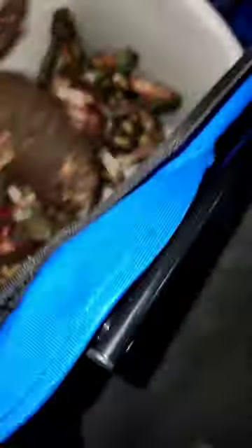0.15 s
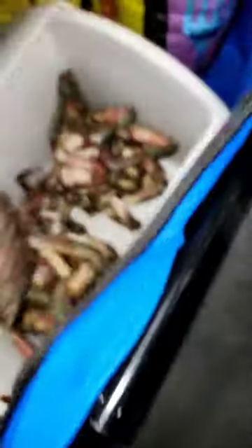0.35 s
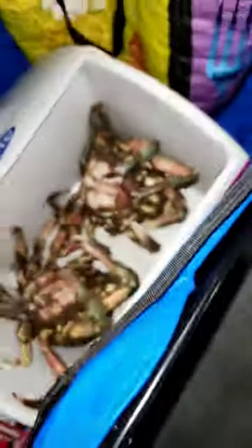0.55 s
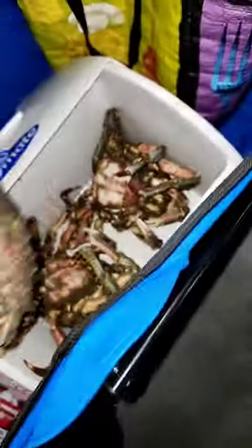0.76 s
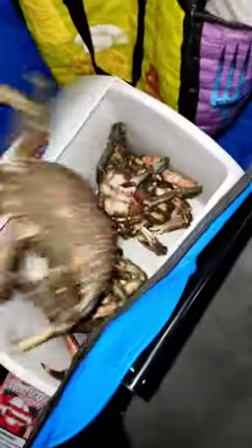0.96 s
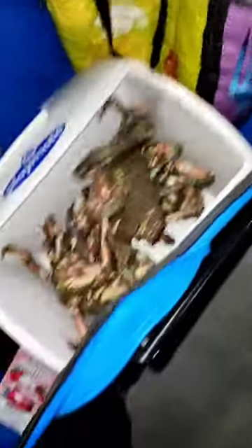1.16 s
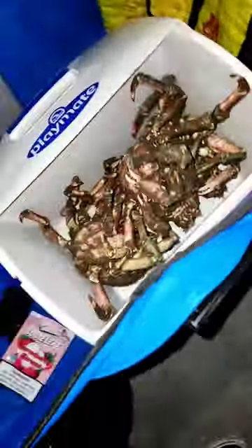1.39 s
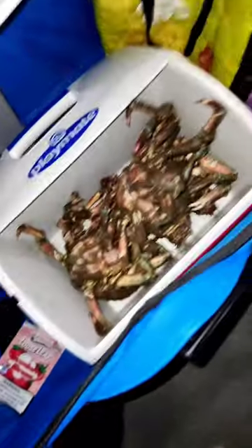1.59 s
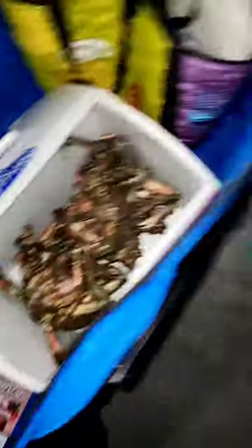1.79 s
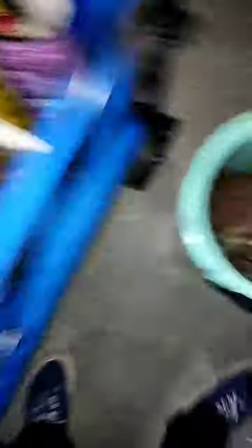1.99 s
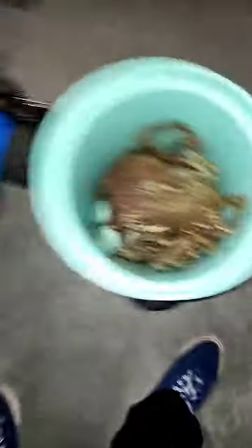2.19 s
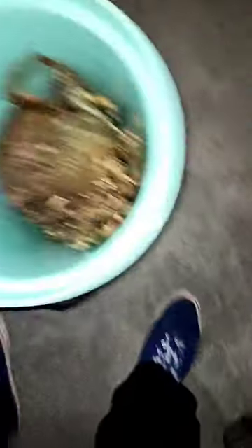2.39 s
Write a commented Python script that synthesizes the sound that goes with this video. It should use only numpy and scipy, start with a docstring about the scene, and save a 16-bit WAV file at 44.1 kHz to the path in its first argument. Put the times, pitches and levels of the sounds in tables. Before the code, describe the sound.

Live crabs tumble and clatter into a hollow hard plastic box, shells clacking and legs scrabbling

```python
"""In a large shed, live crabs tumble into a hard plastic cool box, close to a hand-held phone.
Bodies thump the hollow walls: decaying wall modes, soon damped by the weight of the crab.
Shells clack in short crunchy bursts: clustered contacts drive shell and claw-tip modes.
Legs scrabble in between as random ticks, and a few sliding tips squeak at one resonance.
A low rumble, a broad drone and a distant hiss, all shaped noise, lie behind."""
import sys
import numpy as np
from scipy import signal
from scipy.fft import rfft, irfft
from scipy.io import wavfile
from scipy.ndimage import uniform_filter1d

SR = 44100
rng = np.random.default_rng(int(sys.argv[2]) if len(sys.argv) > 2 else 0)


def generate_wav(sig):
    """Save sig (samples, or channels by samples) to the path in sys.argv[1] as 16-bit PCM at SR."""
    pcm = np.round(np.clip(np.atleast_2d(sig).T, -1, 1) * 32767).astype(np.int16)
    wavfile.write(sys.argv[1], SR, pcm)


N = 108045

# Modes of the box wall. Each row: multiple of the wall pitch, level in dB,
# 60 dB decay time in seconds of a struck wall.
WALL_MODES = [(1.002, 0, 0.14), (1.362, -9.5, 0.067), (2.05, -14, 0.11), (3.0, -19, 0.048)]
# Modes of a shell. Each row: nominal frequency in Hz, level in dB, 60 dB decay time in seconds.
SHELL_MODES = [(741, 7.5, 0.01), (967, -1.5, 0.027), (1183, -0.5, 0.016), (1535, 0.5, 0.012),
               (1708, 4.5, 0.0072), (2071, 2, 0.0072), (2507, -6, 0.0082)]
# Modes of the thin claw tips. Each row: nominal frequency in Hz, level in dB,
# 60 dB decay time in seconds.
CLAW_MODES = [(3500, 0, 0.024), (3760, 2, 0.04), (4890, 5.5, 0.015), (5170, 11.5, 0.014)]
# Colour of the crunch. Each row: frequency in Hz, relative spectral level in dB per Hz.
CRUNCH_COLOUR = [(900, -26), (1800, 3.5), (2900, -3), (5300, -3.5), (7500, -9.5), (9600, -12), (12500, -4),
                 (13300, -7)]

CONTACTS_PER_S, CONTACT_SPREAD_DB = 7000, 2  # dense contacts of shells
LEG_TICKS_PER_S, LEG_SPREAD_DB = 2200, 2.5
CLAW_DB = -4.5  # claw-tip ringing relative to the crunch that drives it
WALL_LOW_HZ = 156.5  # the box radiates little below this


def undb(db):
    """Level in decibels to amplitude ratio."""
    return 10 ** (np.asarray(db) / 20)


def unit(x):
    """Normalises to a root-mean-square of one."""
    return x / np.sqrt(np.mean(x ** 2))


def curve(table, col):
    """Linear interpolation of one table column over the whole scene."""
    rows = np.array(table)
    return np.interp(np.arange(N) / SR, rows[:, 0], rows[:, col])


def low_pass(x, hz, order=2):
    """Butterworth filter that keeps what lies below hz."""
    return signal.sosfilt(signal.butter(order, hz, fs=SR, output="sos"), x)


def high_pass(x, hz, order=2):
    """Butterworth filter that keeps what lies above hz."""
    return signal.sosfilt(signal.butter(order, hz, "high", fs=SR, output="sos"), x)


def colour(x, points):
    """Spectral shaping by (Hz, dB) points, interpolated over log frequency."""
    p = np.array(points)
    f = np.maximum(np.arange(len(x) // 2 + 1) * SR / len(x), 1)
    gain = undb(np.interp(np.log(f), np.log(p[:, 0]), p[:, 1]))
    return irfft(rfft(x) * gain, len(x))


def ring(x, hz, t60):
    """A driven, exponentially decaying mode: a two-pole resonator."""
    radius = np.exp(-np.log(1000) / (t60 * SR))
    angle = 2 * np.pi * hz / SR
    return signal.lfilter([np.sin(angle)], [1, -2 * radius * np.cos(angle), radius ** 2], x)


def ticks(rate, spread_db):
    """Random impulses: tiny contacts of either sign, a few much stronger than the rest."""
    u = rng.random((N, 2))
    strength = undb(-spread_db * np.log(1 - u[:, 1]))
    return unit((u[:, 0] < rate / SR) * strength * rng.choice([-1, 1], N))


def walk(rate):
    """Slow random fluctuation with a spread near 1: twice-smoothed steps."""
    k = int(SR / rate)
    steps = np.repeat(rng.standard_normal(N // k + 1), k)
    return 2.5 * uniform_filter1d(uniform_filter1d(steps, k), k)[:N]


def add(out, s, x):
    """Superposition of a sound that starts at s seconds."""
    i = int(s * SR)
    out[i:i + len(x)] += x[:N - i]


def shell(x, modes, hz, octaves):
    """Modal excitation: a shell or claw rings strongest near the pitch of the struck spot."""
    ratios = (hz / f for f, _, _ in modes)
    tune = min(ratios, key=lambda r: abs(np.log(r)))
    tune = np.clip(tune, .9, 1.1)  # draws the nearest mode to that pitch, by a tenth at most
    out = 0
    for k, (f, db, t60) in enumerate(modes):
        distance = np.log2(f / hz) / octaves
        out = out + (-1) ** k * undb(db - 3.6 * distance ** 2) * ring(x, f * tune, t60)
    return out


def shed():
    """Broadband noise of a large space: a drone, a fluctuating rumble and a distant hiss."""
    # Colour of the shed air. Each row: frequency in Hz, relative spectral level in dB per Hz.
    air_colour = [(20, -2.5), (60, -0.5), (146, -12), (240, -23), (327, -12.5), (420, -22.5), (900, -35),
                  (2100, -40.5), (3000, -50), (4500, -100)]
    # Low rumble. Each row: time in seconds, level in dB.
    rumble_level = [(0, -33.5), (.45, -31.5), (.65, -43), (1.0, -37.5), (1.3, -39.5), (1.9, -34.5),
                    (2.25, -35.5)]
    # Colour of the hiss. Each row: frequency in Hz, relative spectral level in dB per Hz.
    hiss_colour = [(1800, -31), (3300, -1), (5000, -2), (6750, -7.5), (12600, -31)]
    # Distant hiss. Each row: time in seconds, level in dB.
    hiss_level = [(1.0, -66.5), (1.9, -72.5), (2.2, -61.5), (2.45, -69)]
    split_hz = 135  # rumble below, drone above

    air = unit(colour(rng.standard_normal(N), air_colour)) * undb(-31.5)
    low = low_pass(air, split_hz, order=4)
    drone = high_pass(air, split_hz, order=4)
    hiss = unit(colour(rng.standard_normal(N), hiss_colour))
    hiss = hiss * undb(curve(hiss_level, col=1) + 0.35 * walk(8.1))
    rumble = unit(low * undb(2.0 * walk(9.36))) * undb(curve(rumble_level, col=1))
    return hiss + rumble + drone * undb(0.36 * walk(6.98))


def legs():
    """Random excitation: legs tick on plastic and shells, and keep the wall modes humming."""
    # Scrabbling legs. Each row: time in seconds, then the levels in dB of the knocking,
    # the treble and the wall hum.
    scrabble = [(0, -53, -55, -34), (.05, -56, -47.5, -48), (.1, -81, -63, -40.5), (.15, -61, -49, -36),
                (.24, -43.5, -45, -28), (.40, -38, -42, -20), (.47, -49, -53, -24.5),
                (.54, -34, -36.5, -20), (.63, -48.5, -46.5, -20.5), (.69, -55, -62.5, -46),
                (.79, -52.5, -52, -39), (.92, -40, -48, -42.5), (.99, -85, -68.5, -46.5),
                (1.21, -86, -63, -52.5), (1.25, -33, -38, -21), (1.35, -76, -58, -41),
                (1.46, -70, -58.5, -42.5), (1.6, -91, -63.5, -45.5)]
    wall_hz = 251
    airy_hz = 7400  # above this the legs rustle
    rustle_db, rustle_db_per_s = 5, -5  # the rustle starts strong and fades steadily

    jerk = undb(1.9 * walk(59.6))
    mid = unit(shell(ticks(LEG_TICKS_PER_S, LEG_SPREAD_DB) * jerk, SHELL_MODES, 1100.0, 4.))

    top = unit(colour(ticks(LEG_TICKS_PER_S, LEG_SPREAD_DB), CRUNCH_COLOUR) * jerk)
    top = unit(top + undb(CLAW_DB) * unit(shell(top, CLAW_MODES, 4700., 2)))
    rustle = colour(ticks(CONTACTS_PER_S, CONTACT_SPREAD_DB), CRUNCH_COLOUR)
    rustle = unit(rustle * undb(1.9 * walk(40.2)))
    rustle_gain = undb(rustle_db + rustle_db_per_s * np.arange(N) / SR)
    top = low_pass(top, airy_hz) + rustle_gain * high_pass(rustle, airy_hz)

    push = high_pass(ticks(600, 1.38), WALL_LOW_HZ)
    # The hum dies away faster than the ring of a struck wall.
    hum = unit(sum(undb(db) * ring(push, m * wall_hz, t60 * 0.39) for m, db, t60 in WALL_MODES))
    return sum(layer * undb(curve(scrabble, col=c)) for c, layer in ((1, mid), (2, top), (3, hum)))


def squeaks():
    """Stick-slip friction: a sliding leg tip keeps one narrow resonance singing."""
    # Squeaks. Each row: start in seconds, pitch in Hz, level in dB, length of the rub in seconds.
    slides = [(0.022, 1720, -53.5, 0.05), (0.864, 3290, -44.5, 0.017), (0.564, 5150, -46, 0.0671),
              (0.89, 1180, -40.5, 0.028)]
    out, t = np.zeros(N), np.arange(SR // 10) / SR
    rub = ticks(LEG_TICKS_PER_S, LEG_SPREAD_DB)
    for s, hz, db, length in slides:
        i = int(s * SR)
        rubbing = t < length
        tone = ring(rub[i:i + len(t)] * rubbing, hz, t60=0.033)
        add(out, s, undb(db) * tone / np.sqrt(np.mean(tone[rubbing] ** 2)))
    return out


def clacks():
    """Impact excitation: a burst of contacts rings shell modes and crunches in the treble."""
    # Shell on shell and wall. Each row: start in seconds, knock peak in dB, knock centre in Hz,
    # crunch peak in dB, crunch centre in Hz, length of the burst in seconds.
    impacts = [(0.131, -53, 1600, -40, 5600, 0.0054), (0.143, -37.5, 1596, -44, 3020, 0.0088),
               (0.174, -52, 1590, -34, 7100, 0.0035), (0.212, -24.5, 1900, -26.5, 5820, 0.021),
               (0.246, -11.5, 1510, -37, 2840, 0.0086), (0.26, -22, 1660, -14, 8200, 0.0083),
               (0.367, -22.5, 1940, -15, 5050, 0.007), (0.371, -7, 1750, -10, 4850, 0.0098),
               (0.416, -20, 1888, -25, 3030, 0.012), (0.429, -23, 1420, -29.5, 5200, 0.031),
               (0.479, -16.5, 1790, -15.5, 3280, 0.0078), (0.509, -15, 1696, -23, 3360, 0.015),
               (0.545, -20.5, 1025, -25.5, 5150, 0.011), (0.567, -14.5, 870, -30, 4870, 0.037),
               (0.599, -12.5, 990, -19.5, 4640, 0.0075), (0.614, -14, 760, -29, 5200, 0.0064),
               (0.634, -10.5, 1160, -38, 3300, 0.0039), (0.638, -26.5, 1870, -23.5, 5510, 0.0075),
               (0.7226, -26.5, 2077, -24.5, 3430, 0.0082), (0.741, -19.5, 976, -30.5, 3800, 0.0062),
               (0.827, -28, 1600, -37, 5370, 0.0032), (0.859, -32.5, 980, -33, 5200, 0.02),
               (0.945, -23, 1960, -23.5, 3580, 0.009), (1.228, -9, 1966, -24.5, 3390, 0.0062),
               (1.2545, -24, 1550, -10, 4100, 0.0099), (1.258, -7.5, 1143, -15.5, 4400, 0.014),
               (1.282, -24.5, 1990, -13.5, 5180, 0.011), (1.308, -16.5, 770, -31, 2800, 0.0057),
               (1.317, -11, 2050, -17, 5000, 0.0052), (1.322, -21, 1000, -29.5, 3310, 0.015),
               (1.384, -23, 930, -33.5, 3460, 0.013), (1.3975, -15.5, 1770, -15, 5100, 0.0041)]
    tail_s, tail_db = 0.017, -10.5  # weaker contacts that follow the burst
    first_db = 14.5  # first contact, over the average of the rest
    knock_octaves, claw_octaves = 0.78, 0.22  # spread of the modes that are favoured
    crunch_octaves, broad_db = 0.7, -14  # band each side of the centre; level added at all pitches
    crunch_rise = 0.192  # share of the length

    out, t = np.zeros(N), np.arange(SR // 6) / SR
    grit = ticks(CONTACTS_PER_S, CONTACT_SPREAD_DB)
    crunch_noise = unit(colour(ticks(CONTACTS_PER_S, CONTACT_SPREAD_DB), CRUNCH_COLOUR))
    tail = undb(tail_db) * np.exp(-t / tail_s)
    for s, db, hz, top_db, top_hz, length in impacts:
        i = int(s * SR)
        burst = np.exp(-(t / length) ** 2) + tail

        push = grit[i:i + len(t)] * burst
        push[0] = undb(first_db)
        knock = shell(push, SHELL_MODES, hz, knock_octaves)

        broad = crunch_noise[i:i + len(t)]
        edges = top_hz * 2. ** (crunch_octaves * np.array([-1, 1]))
        band = signal.lfilter(*signal.butter(1, edges, "band", fs=SR), broad)
        crunch = unit(unit(band) + undb(broad_db) * unit(broad))
        crunch = crunch + undb(CLAW_DB) * unit(shell(crunch, CLAW_MODES, top_hz, claw_octaves))
        crunch = crunch * burst * np.minimum(t / (crunch_rise * length), 1)

        add(out, s, undb(db) * knock / np.abs(knock).max()
            + undb(top_db) * crunch / np.abs(crunch).max())
    return out


def thumps():
    """Free then damped vibration: a body rings the wall modes until its weight damps them."""
    # Bodies on the wall. Each row: start in seconds, level in dB, wall pitch in Hz,
    # free ring in seconds, fade time constant in seconds once the crab damps it.
    bodies = [(0.141, -19, 259, 0.0097, 0.0055), (0.17, -18.5, 228, 0.048, 0.01),
              (0.224, -16, 204, 0.013, 0.0064), (0.247, -8.5, 246, 0.013, 0.0037),
              (0.305, -11, 163, 0.024, 0.0069), (0.327, -14.5, 266, 0.025, 0.019),
              (0.357, -7.5, 217, 0.015, 0.0074), (0.375, -2, 334.6, 0.014, 0.0043),
              (0.412, -9.5, 277, 0.012, 0.0063), (0.428, -4, 237, 0.023, 0.013),
              (0.449, -12.5, 226, 0.0084, 0.04), (0.49, -20, 258, 0.017, 0.0057),
              (0.515, -10.5, 133, 0.0082, 0.0067), (0.533, -11.5, 258, 0.0095, 0.003),
              (0.556, -14, 229, 0.009, 0.0039), (0.578, 1, 221, 0.0084, 0.0041),
              (0.6, 4, 224, 0.0089, 0.002), (0.616, 0, 236, 0.0093, 0.0014),
              (0.676, -19.5, 344, 0.0042, 0.0025), (0.736, -15, 213.3, 0.012, 0.021),
              (0.826, -24.5, 228, 0.0072, 0.0029), (0.893, -22, 244, 0.0034, 0.0077),
              (1.2307, -6.5, 243, 0.0069, 0.005), (1.257, -2.5, 292, 0.011, 0.0011),
              (1.272, -5, 313, 0.0018, 0.017), (1.311, -7.5, 183, 0.0087, 0.006),
              (1.321, 0, 254.5, 0.0063, 0.058), (1.365, -10.5, 243, 0.0051, 0.0022),
              (1.3834, -18.5, 450, 0.008, 0.0052), (1.4007, -12, 237, 0.015, 0.034)]
    attack_s = 0.0016
    out, t = np.zeros(N), np.arange(SR // 5) / SR
    luck = rng.standard_normal((len(bodies), len(WALL_MODES)))
    for (s, db, hz, free, fade), chance in zip(bodies, luck):
        body = 0
        for k, (multiple, mode_db, t60) in enumerate(WALL_MODES):
            # The upper modes vary by chance, the lowest does not.
            level = undb(mode_db + (k > 0) * 2 * chance[k])
            body = body + level * np.sin(2 * np.pi * multiple * hz * t) * 1000 ** (-t / t60)
        damping = np.exp(-np.maximum(t - free, 0) / fade)
        add(out, s, undb(db) * body * np.minimum(t / attack_s, 1) * damping)
    return high_pass(out, WALL_LOW_HZ)


def scene():
    """Linear superposition of all the sources in one channel."""
    return (thumps() + clacks() + legs() + squeaks() + shed())[None, :]


def record(dry):
    """Saturation and band limiting: the phone rounds the loudest peaks and cuts both ends."""
    ceiling = 0.95  # full scale is 1
    low_hz, top_hz = 45, 13200
    x = high_pass(ceiling * np.tanh(dry / ceiling), low_hz)
    # Steep elliptic low-pass: 0.2 dB ripple, 90 dB rejection.
    return signal.sosfilt(signal.ellip(10, .2, 90, top_hz, fs=SR, output="sos"), x)


dry = scene()
out = record(dry)
generate_wav(out)
```